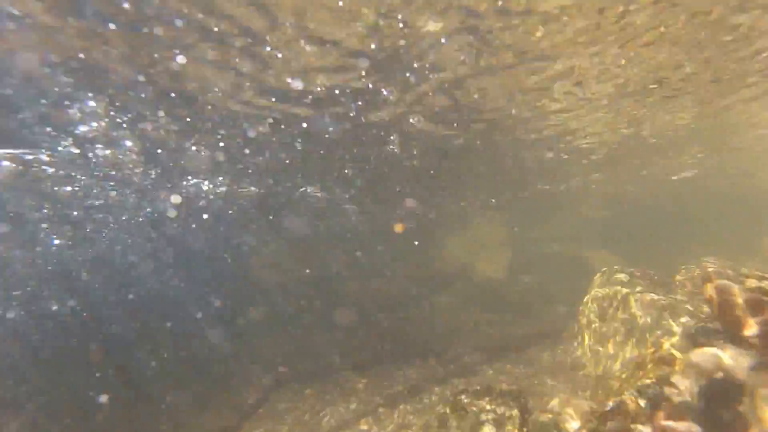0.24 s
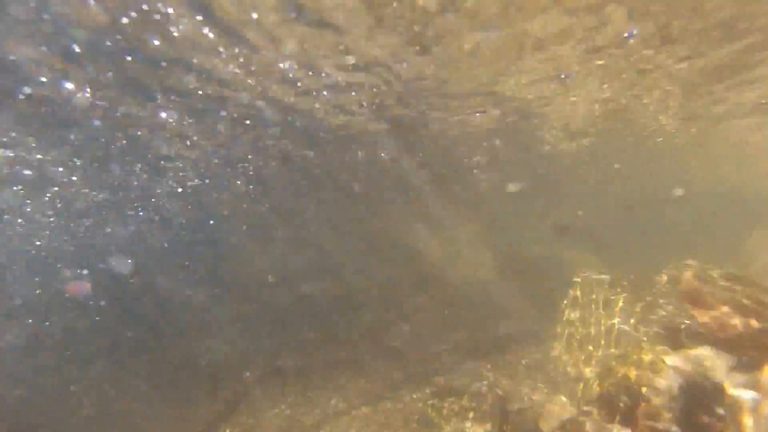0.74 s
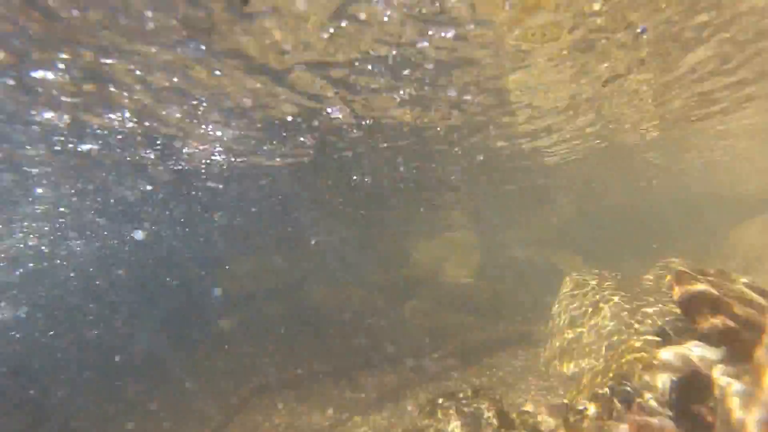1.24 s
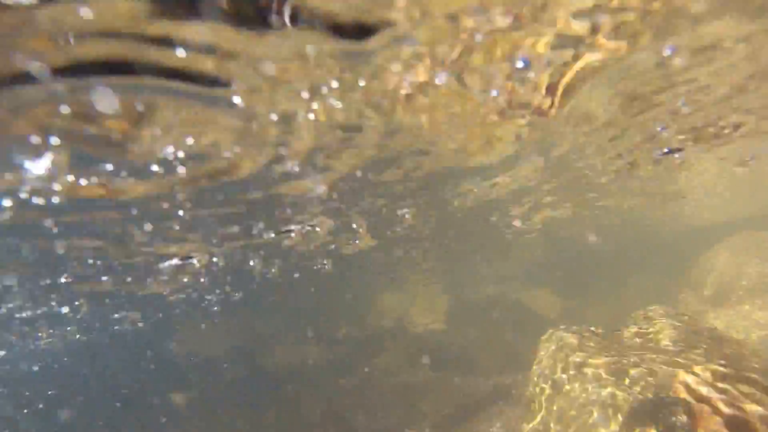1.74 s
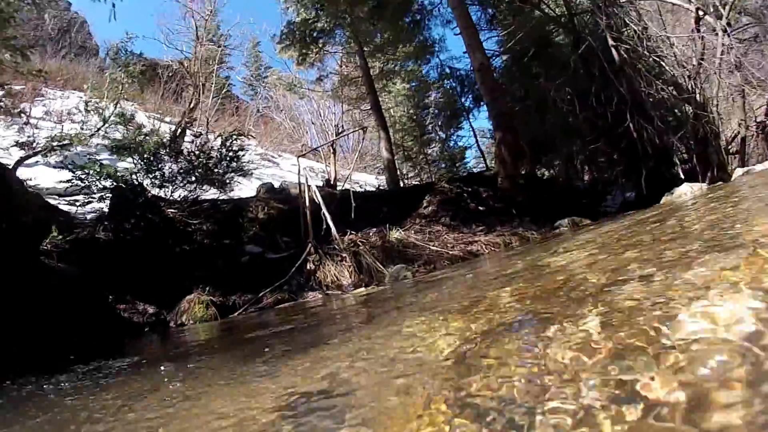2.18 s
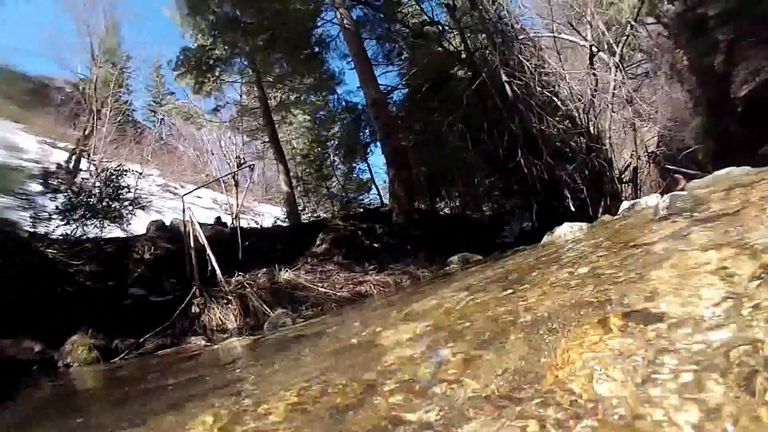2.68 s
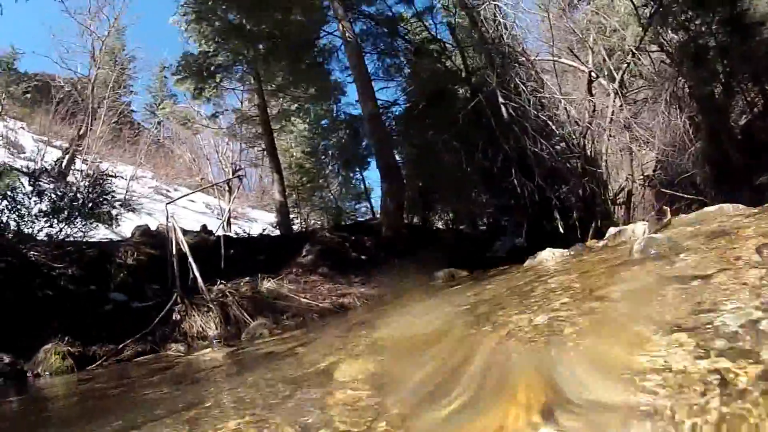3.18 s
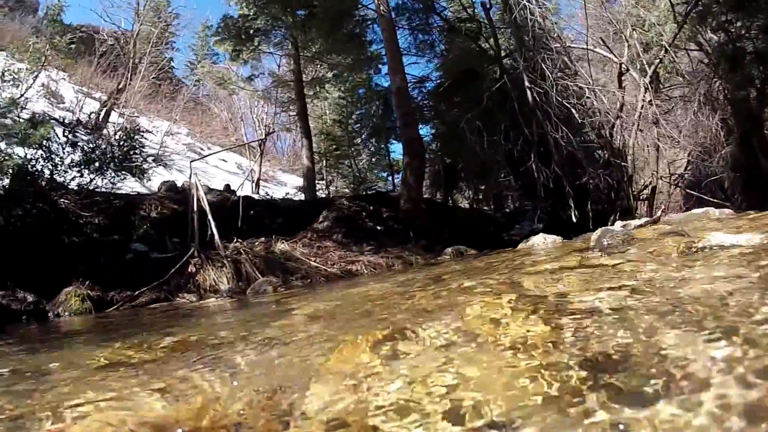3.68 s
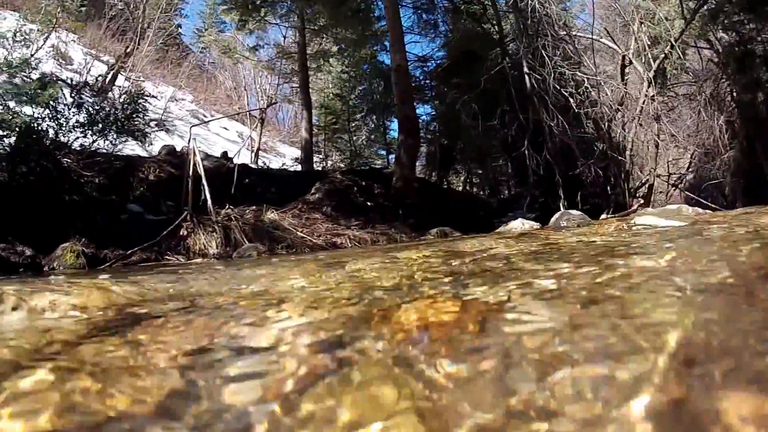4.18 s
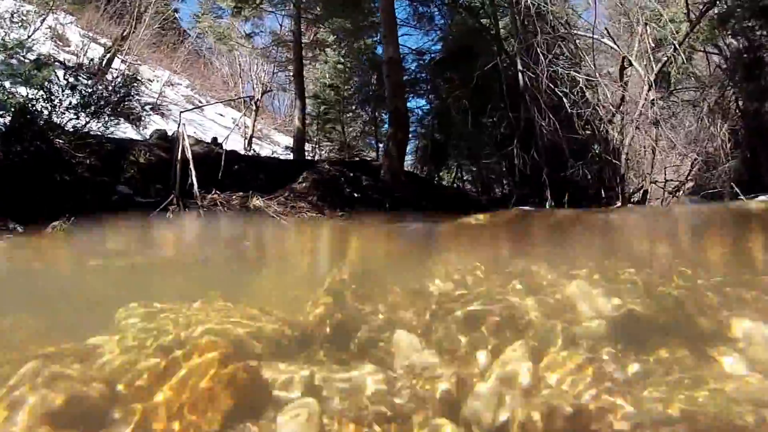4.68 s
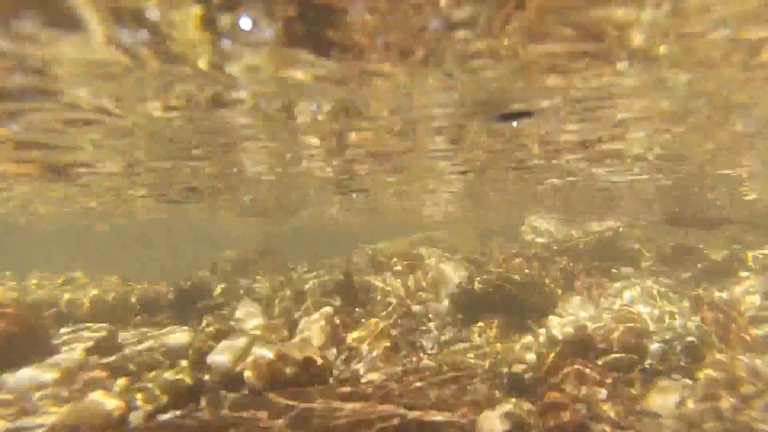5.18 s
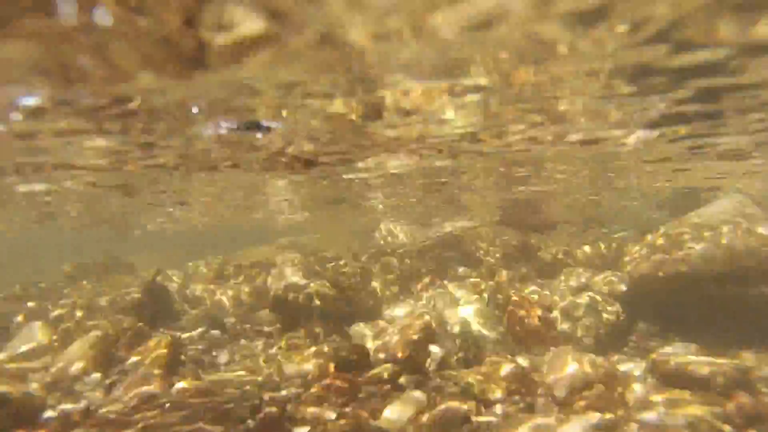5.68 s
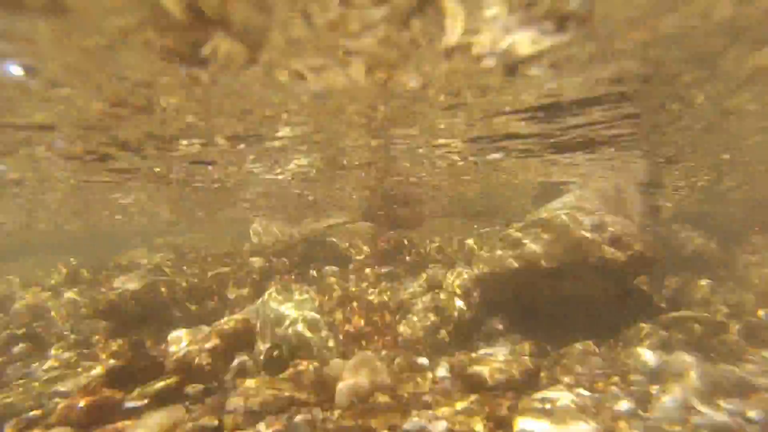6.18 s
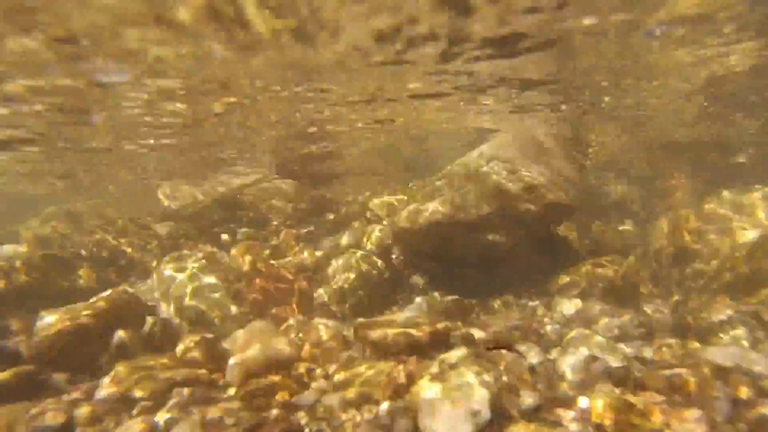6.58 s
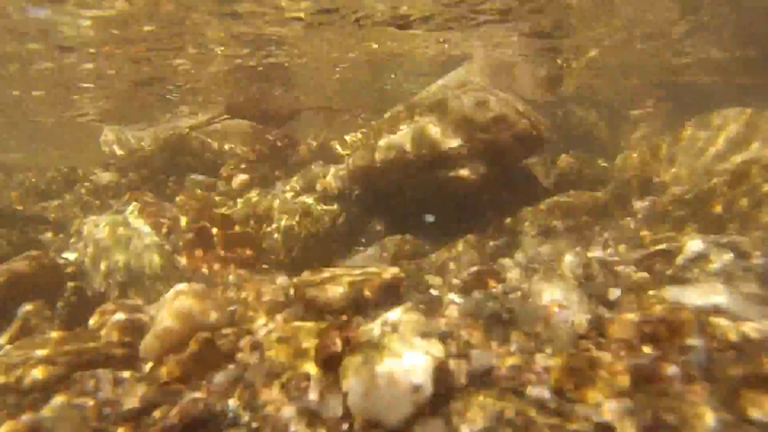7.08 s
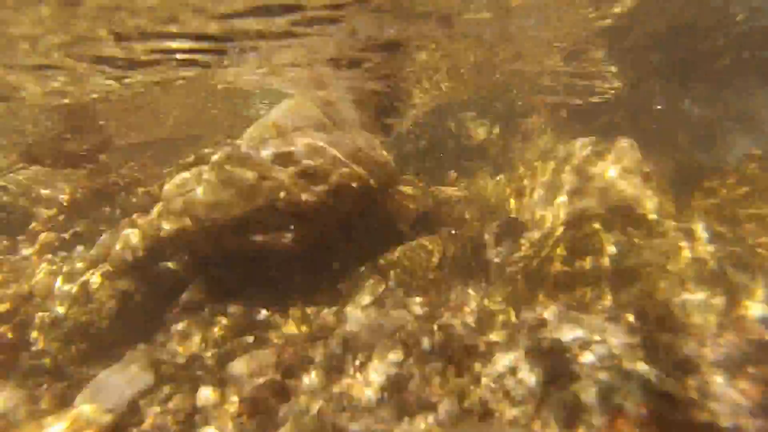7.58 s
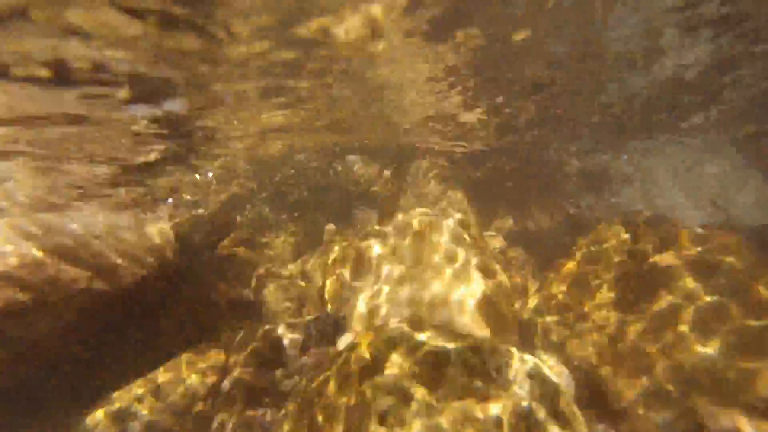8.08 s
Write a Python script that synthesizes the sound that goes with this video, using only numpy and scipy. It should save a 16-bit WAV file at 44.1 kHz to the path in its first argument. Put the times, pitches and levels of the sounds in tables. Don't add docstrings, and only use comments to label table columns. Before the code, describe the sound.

Close, nearly mono sound from inside a plastic case in a shallow stream. From 0 to 0.3 s it scrapes and bumps pebbles with boxy knocks and low thuds, then subsides to low rumble and faint hush. Light scuffs and taps come at 0.5 and 0.75 to 1.25 s. About 2 s the case surfaces and a quiet, brighter riffle of babbling water opens up. At 2.95 s a very loud clipped crack and thump hits, with an aftershock at 3.03. A hollow knock at 3.78 leads into small plops and bright drop ticks until 4.5, when the water dulls again; a soft pop comes near 5.05. Hard hollow clunks strike at 5.48, 5.7 and 5.77 s. From 6.3 to 7.3 s dense knocking, gritty grinding and gravel snaps run together, strongest near 6.8. Afterwards a few small clicks, then muffled stream hush and low rumble.

```python
import sys
import numpy as np
from scipy import signal
from scipy.fft import rfft, irfft, next_fast_len
from scipy.io import wavfile
from scipy.ndimage import uniform_filter1d, map_coordinates

SR = 44100
rng = np.random.default_rng(int(sys.argv[2]) if len(sys.argv) > 2 else 0)


def wav_out(sig):
    wavfile.write(sys.argv[1], SR, np.round(np.clip(np.atleast_2d(sig).T, -1, 1) * 32767).astype(np.int16))


def ratio_of_db(decibels):
    return 10 ** (np.asarray(decibels, float) / 20)


N = 368101

AIR_START_S, AIR_END_S = 1.95, 4.6
SHELL_UNLOADED, WALL_UNLOADED = 1.1, 1.15


def unit(x):
    return x / np.sqrt(np.mean(x ** 2) + 1e-20)


def peak(x):
    return x / np.abs(x).max()


def along(points, hz):
    f, v = np.transpose(points)
    return np.interp(np.log(hz + 1), np.log(f + 1), v)


def curves(rows, outside=None):
    s, *cols = np.transpose(rows)
    return np.array([np.interp(np.arange(N) / SR, s, c, outside, outside) for c in cols])


def wobble(rate):
    return map_coordinates(rng.standard_normal(int(N * rate / SR) + 4), [np.arange(N) * rate / SR])


def filtered(x, response):
    m = next_fast_len(N + SR // 2)
    return irfft(rfft(x, m) * response(np.fft.rfftfreq(m, 1 / SR)), m)[..., :N]


def coloured(x, spectrum):
    return unit(filtered(x, lambda hz: ratio_of_db(along(spectrum, hz))))


def resonances(modes):
    def response(f):
        total = 0
        for k, (c, w, db) in enumerate(modes):
            total = total + (-1) ** k * ratio_of_db(db) * 1j * f * w / (c * c - f * f + 1j * f * w)
        return total
    return response


def steep(modes):
    return lambda f: sum(ratio_of_db(db) * resonances([(c, w, 0)])(f) ** 2 for c, w, db in modes)


def damping(hz):
    soft_hz = 3700
    return (1 + 1.2j * hz / soft_hz - (hz / soft_hz) ** 2) ** -2


def notch(f):
    left = 0.45
    return 1 - (1 - left) * resonances([(2870, 600, 0)])(f)


def rush(spectrum, patchy_db):
    z = signal.stft(rng.standard_normal(N), nperseg=512)[2]
    field = uniform_filter1d(rng.standard_normal(z.shape), size=5, axis=0)
    field = uniform_filter1d(field, size=10, axis=1)
    x = signal.istft(z * ratio_of_db(patchy_db * unit(field)), nperseg=512)[1][:N]
    return coloured(x, spectrum)


def slips(count, spread_db):
    when, size, sign = rng.random((count, 3)).T
    impulses = ratio_of_db(-spread_db * np.log(size + 0.012)) * np.sign(sign - .5)
    return np.bincount((when * N).astype(int), impulses, N)


def add(track, s, sound):
    track[max(round(s * SR), 0):][:len(sound)] += sound


# start in s, peak in dB, ring in Hz.
NUDGES = [(0.001, -28, 1690), (0.025, -26.5, 615), (0.034, -26, 1380), (0.054, -25, 1510),
          (0.066, -24, 910), (0.09, -32.5, 990), (0.108, -36, 1500), (0.141, -39, 1500), (0.155, -47, 580),
          (0.196, -42, 1100), (0.216, -36, 1500), (0.246, -41, 1100), (0.274, -38, 1600),
          (0.394, -39.5, 1380), (0.872, -35.5, 1390), (0.903, -43, 1520), (0.934, -36, 1200),
          (0.965, -34, 1280), (0.981, -30, 1090), (1.076, -30.5, 1180), (1.207, -36, 1470),
          (1.219, -28, 1330), (1.227, -34.5, 600)]
# start in s, peak in dB, ring in Hz, crack in dB above peak.
BUMPS = [(0.542, -24.5, 950, -50), (2.943, 10.5, 1530, -11.5), (2.961, -5.5, 1490, -29),
         (2.971, -18.5, 1427, -50.5), (2.978, -20, 1483, -46), (2.987, -23, 1480, -34),
         (3.024, -7.5, 1420, -59), (3.038, -6, 1505, -60), (5.477, -4.5, 1011, -18.5),
         (5.513, -23, 774, -51), (5.693, 1.5, 922, -38), (5.735, -18, 700, -58), (5.766, 1.5, 930, -31.5),
         (5.796, -17, 960, -68), (5.809, -6, 737, -45), (6.308, -4.5, 1455, -48), (6.323, -6, 765, -34),
         (6.331, -6.5, 950, -23), (6.393, -17, 1150, -53), (6.409, -27, 1000, -28)]
# start in s, peak in dB, ring in Hz, crack in dB above peak.
PLOPS = [(2.402, -39.5, 1760, -22), (3.751, -30, 1500, -8.5), (3.779, -3.5, 1448, -25),
         (3.854, -17.5, 1260, -43), (3.873, -24.5, 2170, -16), (3.886, -14.5, 2600, -28),
         (3.943, -30, 1300, -12), (3.951, -32, 1900, -2), (3.983, -32, 1920, -9.5), (4.016, -22, 1170, -35),
         (4.034, -20, 1160, -24.5), (4.04, -34.5, 810, -48.5), (4.231, -47, 1350, -13),
         (4.386, -42, 2080, -24), (4.426, -43.5, 990, -11), (4.483, -42.5, 2180, -10.5),
         (5.035, -29.5, 1870, -37.5), (5.052, -31.5, 935, -29), (5.053, -46, 3920, -29)]
# start in s, peak in dB, ring in Hz, crack in dB above peak.
CATCHES = [(6.568, -19, 950, -50.5), (6.595, -7, 1040, -24.5), (6.678, -13.5, 795, -36),
           (6.704, -11.5, 2070, -38), (6.717, -14.5, 1750, -20.5), (6.746, -20.5, 740, -31),
           (6.777, 2.5, 834, -37.5), (6.796, -18.5, 1960, -36), (6.822, -23, 1120, -32),
           (6.852, -18, 930, -33), (6.877, -6, 1060, -30), (6.906, -15.5, 980, -45), (6.936, -8, 850, -51),
           (6.975, -28, 770, -38), (6.998, -28, 1030, -45.5), (7.049, -29.5, 1800, -30),
           (7.099, -31, 1000, -8.5), (7.131, -26, 680, -40), (7.165, -11, 934, -31),
           (7.195, -8, 945, -25.5), (7.278, -23, 950, -35), (7.356, -41.5, 730, -7),
           (7.479, -30.5, 1055, -14.5), (7.537, -44, 2060, 1.5)]
# start in s, peak in dB, ring in Hz, crack in dB above peak.
SECOND_PANELS = [(0.542, -24.5, 1560, -34), (0.559, -40, 1190, -30), (2.943, -7, 655.6, -39.5),
                 (2.9435, -5, 2574, -10), (2.945, 0, 1145, -40), (3.023, -12.5, 617, -50.5),
                 (3.028, -16.5, 1396, -47), (3.038, -17, 742, -60.5), (3.055, -57, 2200, -49),
                 (3.779, -11.5, 2005, -39), (3.781, -14, 1572, -49), (3.886, -16, 1410, -28),
                 (3.888, -16.5, 3170, -28.5), (5.477, -4.5, 662, -37.5), (5.477, -2, 1980, -40.5),
                 (5.484, -21.5, 910, -40.5), (5.692, -13, 600, -47.5), (5.694, -8.5, 4010, -12),
                 (5.767, -3, 1666, -19), (5.767, -13, 3436, -19), (5.798, -29, 1500, -55),
                 (5.804, -26, 900, -55), (5.809, -17, 1360, -53), (5.816, -20, 1000, -50.5),
                 (6.777, 0, 1607, -38.5), (6.878, -3.5, 1886, -24.5), (6.937, -13.5, 1850, -31)]
# start in s, peak in dB, ring in Hz, crack in dB above peak.
SNAPS = [(0.743, -52, 1200, -43), (0.773, -51, 1500, -40), (0.812, -53, 1700, -40), (0.841, -40, 1290, -40),
         (0.85, -49, 1800, -33), (0.912, -38, 2000, -30), (0.947, -42, 1600, -30), (1.043, -43, 1400, -30),
         (1.197, -45, 1500, -30), (6.319, -11.5, 1510, -34), (6.339, -24, 900, -23.5),
         (6.358, -31, 1000, -32), (6.464, -36, 1600, -31), (6.471, -35.5, 1800, -21),
         (6.495, -39, 1500, -15), (6.512, -29, 1000, -34), (6.531, -27, 1490, -30),
         (6.55, -30, 1200, -21.5), (6.591, -20, 1200, -25), (6.601, -15, 1880, -19),
         (6.657, -21.5, 900, -19.5), (6.673, -24, 2500, -18.5), (6.686, -16, 990, -22),
         (6.696, -28, 3500, -10), (6.712, -17, 2500, -21), (6.736, -26, 1800, -20), (6.896, -33, 2200, -15),
         (6.926, -31.5, 1900, -28), (6.957, -26, 1500, -29.5), (6.971, -24, 1910, -23.5),
         (7.01, -33, 1890, -21), (7.063, -42, 1900, -11), (7.086, -37, 1800, -16),
         (7.119, -33.5, 1910, -20), (7.173, -13, 950, -39.5), (7.174, -21.5, 1800, -36),
         (7.215, -29, 2000, -15), (7.227, -32, 2000, -26), (6.4, -23, 1500, -31), (6.281, -36, 875, -35),
         (7.25, -46.5, 1850, -27), (7.266, -45, 1694, -32)]
# chatter t60 in s, wall in dB for a 0 dB contact,
# wall growth in dB per dB, shell in dB.
TOUCH = [
    (0.029, 4.5, 1.43, -0.5),
    (0.011, -22.5, .5, -2.1),
    (0.01, -35, 0.45, -21.5),
    (0.02, -18, 0.53, 3.5),
    (0.0043, -45, -0.3, -19.5),
    (0.013, -21.5, 0.6, 0.5),
]


def contacts():
    nudges = [(*row, -40) for row in NUDGES]
    kinds = [nudges, BUMPS, PLOPS, CATCHES, SECOND_PANELS, SNAPS]
    return [(*row, *manner) for rows, manner in zip(kinds, TOUCH) for row in rows]


# centre in Hz, width in Hz, level in dB.
CASE = [(376, 130, -4.5), (706, 350, 0), (950, 490, 4.5), (1260, 610, -4.5), (1724, 430, 3),
        (2390, 910, -12.5), (3500, 450, -20)]


def knocks():
    wall_base_hz, wall_t60_s, wall_stray = 248.5, 0.072, 0.015
    out, t = np.zeros(N + SR), np.arange(4096) / SR
    f = np.fft.rfftfreq(len(t), 1 / SR)
    bright = [1 / (1 + (2400 / (f + 1)) ** 4) / (1 + (f / top_hz) ** 3) for top_hz in (4200, 6500)]
    shells = [ratio_of_db(-4.5) * steep(CASE)(f), ratio_of_db(-10) * steep(CASE)(f / SHELL_UNLOADED)]
    for s, db, hz, crack_db, t60, wall_db, grows, shell_db in contacts():
        rough, fine = rng.standard_normal((2, len(t)))
        dry = AIR_START_S < s < AIR_END_S

        rattle = ratio_of_db(-42.5 - 60 * t / 0.052)
        onset = 1 - np.exp(-t / (0.0046 * t60))
        chatter = rough * (ratio_of_db(-60 * t / t60) + rattle) * onset

        panel_width = (.28 if dry else .38) * hz
        panel = resonances([(hz, panel_width, 0)])(f) * steep([(hz, .9 * hz, 0)])(f)
        shell = ratio_of_db(shell_db) * shells[dry]
        blunt = (1 + 1j * f / (2.9 * hz)) ** -2
        body = (panel + shell) * blunt * damping(f) * (1 if dry else notch(f))
        ring = peak(irfft(rfft(chatter) * body, len(t)))

        wall_hz = wall_base_hz * (WALL_UNLOADED if dry else 1) * (1 + wall_stray * np.tanh(fine[-1]))
        wall_fade_db = -60 * t / (wall_t60_s * (1.1 if dry else 1))
        wall = ratio_of_db(wall_db + (grows - 1) * db + wall_fade_db) * np.sin(2 * np.pi * wall_hz * t)
        wall *= 1 - np.exp(-t / .001)

        crack = irfft(rfft(fine) * bright[dry], len(t)) * ratio_of_db(-60 * t / (0.45 * t60))
        crack = ratio_of_db(crack_db + 2.5) * peak(crack * (1 - np.exp(-t / 0.00022)))
        add(out, s + 0.00029, ratio_of_db(db + 2.0) * (ring + wall + crack))
    return out[:N]


# start in s, length in s, grind in dB, groan in dB, grit in dB.
DRAGS = [(0.0, 0.16, -46, -34.5, -58.5), (0.73, 0.1, -55.5, -55.5, -85), (0.828, 0.095, -48, -42, -78),
         (0.94, 0.15, -51.5, -37.5, -82), (1.098, 0.15, -58.5, -45, -88), (2.966, 0.051, -38.5, -39.5, -81),
         (5.482, 0.025, -55.5, -26.5, -79.5), (5.512, 0.011, -38.5, -39, -79.5),
         (5.691, 0.065, -59, -32, -83), (5.774, 0.034, -50, -39, -78.5), (6.275, 0.023, -56.5, -38, -80),
         (6.298, 0.078, -45, -30.5, -55.5), (6.389, 0.04, -35, -28, -57), (6.457, 0.17, -40, -27.5, -55),
         (6.586, 0.092, -32, -37.5, -38.5), (6.65, 0.05, -42, -41, -39.5), (6.7, 0.018, -30, -19.5, -32),
         (6.732, 0.018, -33, -26, -43), (6.976, 0.047, -51.5, -40, -54), (7.245, 0.072, -63, -48.5, -63),
         (5.735, 0.018, -45, -38, -82), (6.776, 0.11, -40, -32.5, -66.5), (6.867, 0.058, -45.5, -33, -67.5),
         (6.922, 0.05, -28, -34, -45.5), (7.038, 0.073, -48.5, -39, -55), (7.116, 0.063, -52, -35, -58),
         (7.158, 0.015, -37, -35, -46), (7.191, 0.02, -32, -22, -36.5), (0.183, 0.097, -54, -38, -59)]


def strokes():
    edge_s, lift_s = .006, .025
    bite_share, bite_db, ease_db = 0.22, -4, -7.5
    gains = np.zeros((N + SR, 3))
    for s, long, *levels_db in DRAGS:
        end = long + lift_s
        t = np.arange(round(end * SR)) / SR
        knots_s = [0, edge_s, edge_s + bite_share * long, long, end]
        shape = np.interp(t, knots_s, [0, ratio_of_db(bite_db), 1, ratio_of_db(ease_db), 0])
        shape *= np.clip((end - t) / lift_s, 0, 1)
        add(gains, s, np.outer(shape, ratio_of_db(np.array(levels_db))))
    return gains[:N].T


# centre in Hz, width in Hz, level in dB.
GROAN = [(64.5, 18, -2.5), (150, 29, -3.5), (244, 78, -12.5)]
# frequency in Hz, density in dB per Hz.
GRIT = [(1760, -39.5), (2500, -6), (3400, 3), (4230, -12.5), (5300, -10.5), (6000, -23.5), (6900, -11.5),
        (7700, -26.5), (9200, -22.5), (10400, -34.5), (11700, -33.5), (13000, -42.5), (16000, -58)]


def drags():
    grind_gain, groan_gain, grit_gain = strokes()
    clumps = ratio_of_db(1.5 * wobble(45) + 2.4 * wobble(160))
    grind = np.zeros(N)
    for mode in CASE:
        mode_slips = slips(count=5000, spread_db=2.4) * clumps * ratio_of_db(2 * wobble(60))
        grind += filtered(mode_slips, steep([mode]))
    grind = unit(filtered(grind, lambda hz: damping(hz) * notch(hz)))
    grit = coloured(slips(count=60000, spread_db=4) * np.sqrt(clumps), GRIT)
    groan = slips(count=3000, spread_db=5) * clumps ** 0.26
    groan = unit(filtered(groan, lambda hz: resonances(GROAN)(hz) * damping(2 * hz)))
    return ratio_of_db(4.0) * grind_gain * grind + ratio_of_db(4.5) * groan_gain * groan + ratio_of_db(-6.0) * grit_gain * grit


# start in s, peak in dB, swing in Hz, life in swings.
SHOVES = [(0.056, -18, 99, 0.41), (0.544, -25, 85, 0.51), (0.945, -30, 24, 0.3), (1.071, -28.5, 48, 0.46),
          (3.038, -15.5, 275, 0.96), (3.78, -28, 206, 0.46), (4.034, -35, 260, 2.4),
          (4.541, -42.5, 256.3, 2.6), (4.801, -51, 260, 1.9), (5.178, -48.5, 260, 1.7),
          (5.045, -38, 240, 0.82), (6.686, -16, 100, .5), (5.477, -1.5, 47, 0.24), (5.514, -21.5, 54, 1.27),
          (5.692, -6.5, 46, 0.22), (5.768, -14, 58, 0.45), (5.809, -19.5, 114, 0.81),
          (6.455, -22, 21, 0.93), (6.762, -22, 28, 0.43), (6.946, -22.5, 49, 0.3), (6.321, -5.5, 110, 0.46),
          (6.331, -6.5, 70, 0.5), (6.511, -19.5, 47, 0.65), (6.68, -14, 33, 0.87), (7.16, -24, 17, 0.43),
          (6.708, -23, 18, 1.6), (7.127, -21.5, 31, 1.2), (7.271, -29.5, 36, 2.6)]
# start in s, peak in dB, swing in Hz, life in swings.
TUGS = [(0.038, -16, 151, 1), (0.066, -12, 42.3, 0.15), (0.869, -25.5, 72, 1), (2.945, 5.5, 44.83, 0.17),
        (3.023, -8.5, 148.4, 0.51), (6.416, -18, 39.7, 0.54), (6.858, -15, 60.5, 0.75),
        (6.308, -7, 72.3, 0.33), (6.53, -12, 20.91, 0.83), (6.582, -13.5, 24, 0.4), (6.784, -13, 48.5, 1),
        (7.196, -10, 28.6, 0.97)]


def jolts():
    out, t = np.zeros(N + SR), np.arange(SR // 5) / SR
    onset = 1 - np.exp(-(t / 0.0013) ** 2)
    for sign, table in ((1.0, SHOVES), (-0.63, TUGS)):
        for s, db, hz, life in table:
            swing = np.cos(2 * np.pi * hz * t) * np.exp(-hz * t / life)
            add(out, s, sign * ratio_of_db(db + 9.0) * swing * onset)
    return out[:N]


# start in s, peak in dB, ring in Hz, t60 in s.
PINGS = [(0.054, -24, 250, .07), (0.034, -24, 1610, .025), (0.056, -24, 1650, .025), (0.069, -30, 950, .03),
         (0.871, -40, 950, .02), (0.983, -35, 1110, .02), (1.076, -27, 1050, 0.033),
         (1.076, -30, 1500, .02), (1.216, -29, 990, .025), (3.782, -15.5, 1550, 0.037),
         (4.036, -30, 794, 0.055), (5.035, -29, 1970, 0.021), (5.053, -24, 1000, 0.034),
         (5.053, -32.5, 2750, .02), (6.568, -11, 1000, .022), (6.406, -17, 1470, .02),
         (6.797, -15, 1900, 0.016), (6.906, -12, 1110, .02), (0.141, -36, 950, 0.028),
         (6.768, -45, 3600, 0.012), (6.844, -15, 930, .02), (7.166, -6, 950, 0.036),
         (7.168, -20.5, 1770, 0.03), (7.28, -24, 988, 0.04), (4.232, -33, 5000, .002),
         (4.344, -34, 8000, .0015), (4.367, -34, 9000, .0015), (4.457, -42.5, 11900, 0.0034),
         (7.099, -35.5, 6400, .004), (5.029, -43, 3000, .006)]


def pings():
    out, t = np.zeros(N + SR), np.arange(3000) / SR
    for s, db, hz, t60 in PINGS:
        onset = 1 - np.exp(-t * hz / 1.5)
        add(out, s + 0.00055, ratio_of_db(db - 60 * t / t60) * np.sin(2 * np.pi * hz * t) * onset)
    return out[:N]


# start in s, peak in dB, ring in Hz.
TICKS = [(2.4004, -29, 3500), (3.7507, -22, 5400), (3.8725, -21, 3170), (3.943, -34, 7740),
         (3.95, -20, 8500), (3.9827, -49, 3200), (4.0297, -37, 5400), (4.1496, -44, 3660),
         (4.2322, -36, 3700), (4.3444, -41, 3060), (4.368, -35, 6900), (4.3867, -43, 3210),
         (4.4573, -41, 3460), (4.4815, -25, 5340), (5.0513, -39, 5390), (5.5541, -60, 3070),
         (6.4087, -42, 3430), (7.479, -31, 3300)]


def ticks():
    out, t = np.zeros(N + SR), np.arange(600) / SR
    onset = 1 - np.exp(-t / 0.00026)
    for s, db, hz in TICKS:
        add(out, s + 0.0015, ratio_of_db(db - 4.0 - 60 * t / 0.0056) * np.sin(2 * np.pi * hz * t) * onset)
    return out[:N]


# time in s, rumble in dB.
STREAM = [(0.0, -22), (0.3, -42.5), (0.8, -41), (1.04, -32.5), (1.2, -45), (1.86, -35.5), (2.6, -41.5),
          (2.9, -34.5), (4.4, -37), (6.28, -37), (6.5, -23), (6.74, -32.5), (6.92, -36), (7.3, -27.5),
          (7.46, -44), (8.07, -34.5), (8.35, -41.5)]
# frequency in Hz, density in dB per Hz.
CURRENT = [(8, -35), (15, 8), (37, -1), (50, -3.5), (68, -11.5), (97, -22.5), (140, -33.5), (200, -46.5),
           (300, -46), (600, -120)]


def current():
    lumps_db = 1.3 * wobble(12) + 2.4 * wobble(10)
    return ratio_of_db(curves(STREAM)[0] + lumps_db) * rush(CURRENT, patchy_db=2.0)


# time in s, level in dB.
ABOVE = [
    (1.92, -62),
    (2.08, -52.5),
    (2.3, -51.5),
    (3.9, -55.5),
    (4.25, -57.5),
    (4.5, -66),
    (4.95, -68),
    (5.4, -91),
]
# time in s, level in dB.
FLOODING = [
    (3.2, -72),
    (3.95, -53),
    (4.5, -57.5),
    (5.4, -70),
]
# frequency in Hz, density in dB per Hz.
RIFFLE = [(470, -46), (800, -14.5), (1190, -8.5), (1500, 1), (1920, -8), (2100, -12.5), (2380, -12),
          (3110, -19), (3700, -17.5), (4400, -30.5), (5340, -23.5), (6230, -32.5), (8000, -34.5),
          (10400, -62), (17600, -120)]
# frequency in Hz, density in dB per Hz.
SINKING = [(600, -64), (1000, -6.5), (1350, -9), (1600, -7), (1850, -12), (2130, 1), (2400, -15),
           (3200, -17), (3800, -19), (4500, -24), (8000, -31.5), (12000, -67)]


def riffle():
    lap_db = 0.92 * wobble(16)
    splash = coloured(slips(count=9000, spread_db=4.0), RIFFLE)
    in_air = unit(rush(RIFFLE, patchy_db=1.5) + 0.41 * splash)
    flooded = rush(SINKING, patchy_db=1.5)
    return ratio_of_db(curves(ABOVE, -120)[0] + lap_db) * in_air + ratio_of_db(curves(FLOODING, -120)[0] + lap_db) * flooded


# time in s, level in dB.
UNDER = [
    (0, -56),
    (1.9, -56.5),
    (2.2, -59.5),
    (4.4, -57),
    (5.1, -53.5),
    (6.1, -52.5),
    (7.6, -49.5),
    (8.35, -49),
]
# frequency in Hz, density in dB per Hz.
HUSH = [(53, -29.5), (90, -1), (245, -4), (291, -11.5), (394, -8), (524, -10), (743, -7), (1010, -22.5),
        (1050, -15.5), (1200, -18.5), (1470, -22.5), (1750, -21.5), (2730, -28), (4000, -36.5), (5200, -71),
        (8800, -120)]


def hush():
    return ratio_of_db(curves(UNDER)[0] + .6 * wobble(3)) * rush(HUSH, patchy_db=1.2)


# frequency in Hz, density in dB per Hz.
HISS = [(880, -28.5), (1500, 4), (3180, -4.5), (3690, 0), (9460, -3.5), (13500, -5.5), (15500, -8),
        (16000, -36)]


def hiss():
    return ratio_of_db(-70) * rush(HISS, patchy_db=.6)


# frequency in Hz, density in dB per Hz.
APART = [(600, -40), (1800, -14), (3500, -4), (12000, -7), (14500, -10), (16000, -28)]


def hiss_apart():
    return ratio_of_db(-79) * rush(APART, patchy_db=.4)


def ducking(blows):
    duck_db, recover_s = -26.5, 0.057
    keep = np.exp(-1 / (recover_s * SR))
    loudness = signal.lfilter([1 - keep], [1, -keep], np.minimum(np.abs(blows), 1))
    return 1 / (1 + loudness / ratio_of_db(duck_db))


def scene():
    blows = knocks()
    duck = ducking(blows)
    mono = blows + drags() + jolts() + pings() + ticks() + current()
    mono = mono + duck * (riffle() + hush() + hiss())
    apart = duck * hiss_apart()
    return np.array([mono + apart, mono - apart])


# frequency in Hz, level in dB.
CROSS = [(30, -36), (1500, -32), (4000, -22), (12000, -21)]


def fluttering_side(x):
    return np.tanh(2 * wobble(250)) * filtered(x, lambda hz: ratio_of_db(along(CROSS, hz)))


def roll_off(x):
    return signal.sosfilt(signal.butter(12, 16130, fs=SR, output="sos"), x)


def record(dry):
    clipped = dry / (1 + np.abs(dry / 1.02) ** 16) ** (1 / 16)
    clipped = filtered(clipped, lambda hz: ratio_of_db(along([(15500, 0), (17500, -12)], hz)))
    side = fluttering_side(clipped[0])
    return roll_off(clipped + [side, -side])


dry = scene()
out = record(dry)
wav_out(out)
```